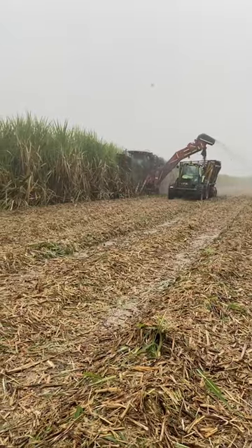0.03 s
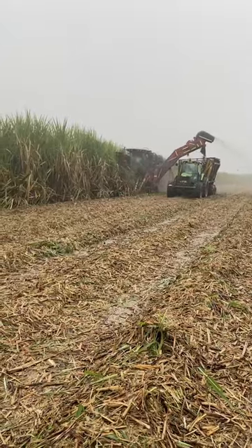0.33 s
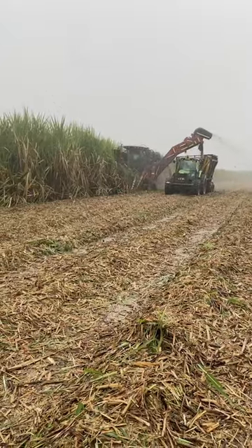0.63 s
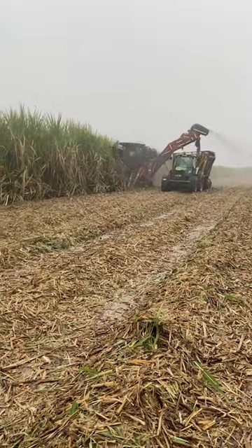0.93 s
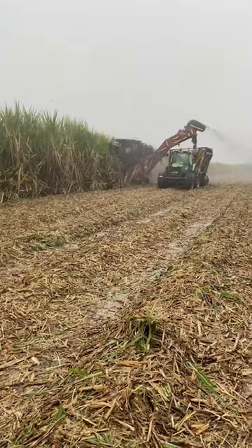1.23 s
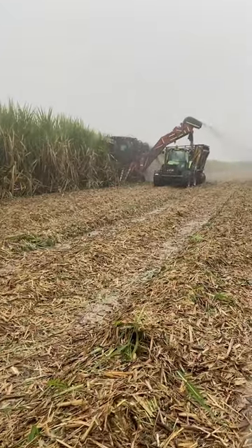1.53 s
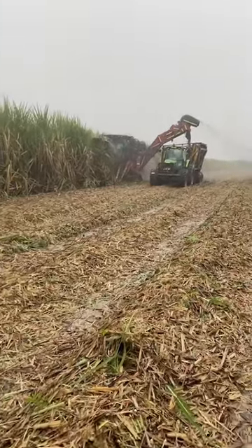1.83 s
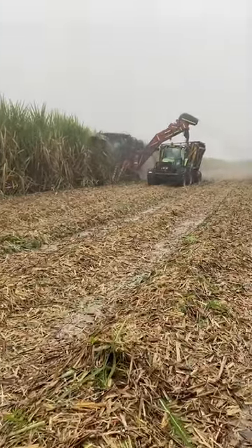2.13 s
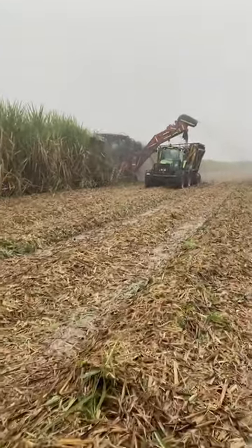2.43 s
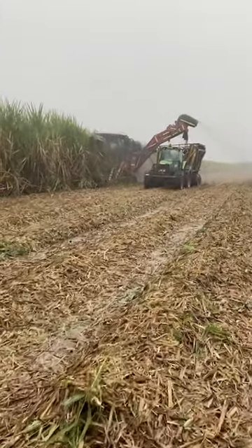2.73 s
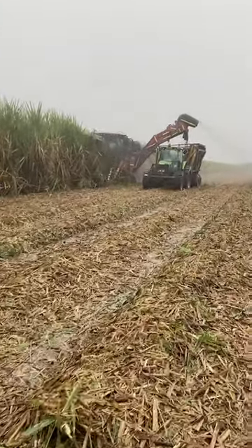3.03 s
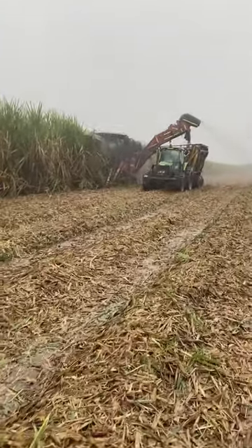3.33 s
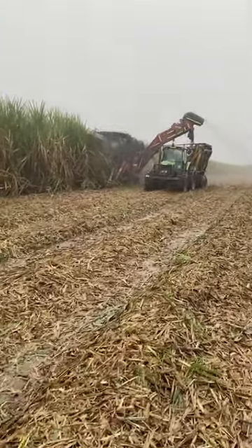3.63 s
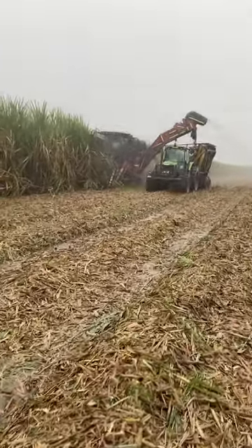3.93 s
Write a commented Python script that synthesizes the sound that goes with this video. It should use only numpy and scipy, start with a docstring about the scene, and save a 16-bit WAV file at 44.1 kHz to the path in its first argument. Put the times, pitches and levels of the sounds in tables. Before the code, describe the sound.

Deep, continuous diesel drone comes from a harvester and a tractor working across an open field, with whirring drums and rustling leaves. Cane twice surges through, snapping and crunching, amid scattered metal clanks and a few close, dull thumps.

```python
"""A sugarcane harvester and a tractor work side by side, some way off in an open field.
From the start a diesel drones and beats against a second engine, over exhaust rumble and gear whine.
Fans roar, chopper drums whirr, leaves hiss and panels clank. After a second come the first stalk snaps
and dull, close bumps. Cane surges in at about 1.4 s and again near 3 s: the roar and crackle swell,
wads crunch, the rustle takes on a hollow colour, and brief tones rise out of the whirr."""
import sys
import numpy as np
from scipy import signal
from scipy.fft import rfft, irfft, next_fast_len
from scipy.io import wavfile
from scipy.ndimage import uniform_filter1d, map_coordinates

SR = 44100
rng = np.random.default_rng(int(sys.argv[2]) if len(sys.argv) > 2 else 0)


def dump(signal):
    """Clip the signal to [-1, 1] and save it as 16-bit WAV at the path in sys.argv[1]."""
    limited = np.clip(np.atleast_2d(signal).T, -1, 1)
    pcm = np.round(limited * 32767).astype(np.int16)
    wavfile.write(sys.argv[1], SR, pcm)


N = 176400

# diesel firing rate: t/s, f/Hz
FIRING_RATE = [(0, 80.55), (1, 80.24), (2.1, 80.04), (2.7, 80.4), (3.5, 80.5), (4, 81.5)]
# cane going through the machine: t/s, load/dB
CANE_LOAD = [(0, 1), (.2, -1), (.45, -2.5), (1.31, -2.5), (1.37, 2), (1.67, 2.5), (1.77, 1.5), (1.87, 2.5),
             (2.02, 2), (2.2, -0.5), (2.38, -2), (2.7, -0.5), (3.0, 4.5), (3.07, 1.5), (3.24, 5),
             (3.38, 0.5), (3.62, 2), (3.7, -1.5), (3.84, 0.5), (4, -2.5)]
# diesel note: t/s, level/dB
DRONE_LEVEL = [(0, -12), (.4, -12), (.75, -11), (1.2, -12), (1.75, -10.5), (2.15, -12.5), (2.5, -11),
               (3.5, -11.5), (4, -11)]
# its overtones: multiple, relative level/dB
DRONE_OVERTONES = [(2, -28.5), (3, -34.5)]
# colours of exhaust, fans and leaves: f/Hz, relative level/dB
EXHAUST_SPECTRUM = [(20, -25), (40, -23), (52, -6.5), (62, -1.5), (75, -8), (100, -7), (118, -5.5),
                    (135, 1), (165, -2.5), (220, -7), (290, -14), (420, -18), (800, -27.5), (3000, -74)]
FAN_SPECTRUM = [(150, -20), (350, -12), (500, -4), (660, 1), (800, -1.5), (950, -3), (1300, -5),
                (1800, -9.5), (2200, -12), (4000, -19), (8000, -24.5), (13000, -34)]
LEAF_SPECTRUM = [(300, -25), (900, -0.5), (1750, 2), (2200, -0.5), (2800, 0.5), (3500, -3.5), (4300, -0.5),
                 (5600, -3), (6400, -3), (7600, -9.5), (8900, -3.5), (10000, -11), (11200, -12.5),
                 (12500, -15.5)]
# colour of the wide low rush: f/Hz, relative level/dB
LOW_RUSH_SPECTRUM = [(20, 1), (80, 0), (200, -10), (500, 4), (900, -14), (2000, -56)]
# gears and pumps: f/Hz, starting level/dB, pitch wander/fraction, growth/(dB/s)
GEAR_WHINES = [(325.5, -45, 0.0026, 0), (366, -53.5, 0.0023, 3), (1307, -43, 0.0039, -.5),
               (1820, -47, 0.00705, 0.5)]
# chopper drum harmonics: multiple, relative level/dB
DRUM_HARMONICS = [(9, -2), (10, -1), (11, -0.5), (12, -1.5), (13, -6.5)]
# narrow bands of hiss: start/s, end/s, f/Hz, width/Hz, level/dB
HISS_BANDS = [(0, .17, 4530, 200, -39), (1.37, 2.0, 1750, 600, -35.5), (1.37, 2.05, 3580, 120, -41.5),
              (1.45, 2.05, 4200, 200, -41), (2.32, 2.47, 4000, 180, -42), (2.799, 3.45, 1720, 189, -38.5),
              (2.8, 3.45, 2600, 80, -43), (2.8, 3.45, 3140, 140, -44), (2.903, 3.1, 4200, 400, -36.5)]
# crushed wads, woody when low and leafy when high: peak t/s, length/s, level/dB, centre f/Hz
WAD_CRUNCHES = [(0.057, 0.17, -41, 9050), (1.44, .09, -30.5, 1700), (1.56, 0.082, -32, 1710),
                (1.71, 0.13, -27.5, 1590), (1.835, 0.045, -36, 9800), (2.12, 0.27, -41, 9200),
                (2.525, 0.053, -34, 1600), (2.95, .12, -34, 1660), (3.275, 0.061, -28.5, 1597),
                (3.85, .06, -35, 1600)]
# panel clanks: t/s, level/dB
PANEL_HITS = [(.06, -30), (.575, -24.5), (1.22, -27), (1.66, -23), (2.075, -26.5), (2.915, -25),
              (3.27, -26), (3.835, -26)]
# sheet-metal modes: f/Hz, relative level/dB, t60/s
PANEL_MODES = [(601, -5, 0.22), (667, 0, 0.2), (756, -2.5, 0.15), (828, -0.5, 0.17)]
# breaking stalks: t/s, level/dB, centre f/Hz
STALK_SNAPS = [(1.062, -27, 3300), (1.657, -23, 2600), (1.878, -22.5, 3400), (1.957, -25, 3600),
               (2.761, -28, 3300), (2.927, -28, 2000), (3.605, -27, 2700)]
# dull bumps: t/s, level/dB, final f/Hz, rise/s
DULL_BUMPS = [(1.065, -18.5, 195, 0.018), (1.4826, -8, 170, 0.003), (1.69, -19.5, 188, 0.021),
              (3.291, -17, 256, .004)]
# bounce off the ground: t/s, strength/fraction
GROUND_BOUNCE = [(1.1, 0), (1.4, 0.37), (1.9, 0.23), (2.2, .08)]
# tones in the whirr: peak t/s, length/s, f/Hz, glide/(Hz/s), level/dB
WHIRR_TONES = [(1.441, .07, 775, -200, -33), (1.59, 0.086, 795, 600, -32), (1.78, .06, 865, 400, -32.5),
               (2.867, .05, 855, 0, -32), (2.945, 0.046, 812, 0, -27.5)]
# microphone pair: f/Hz, left-right correlation
MIC_LIKENESS = [(200, 1), (400, 0.98), (700, 1), (1300, 1), (1700, 1), (2200, 0.59), (3300, 0.68),
                (4200, 0.81), (6000, 1), (7300, 1), (9000, 0.88), (10500, 1), (12500, 0.71)]
# microphone pair: f/Hz, phase lead of left/rad
MIC_LEAD = [(1600, 0), (2100, 0), (2400, 0), (3100, 0.5), (3450, 0.5), (3800, 0.53), (4600, 0.55),
            (5200, -0.06), (5600, 1), (6100, 1.63), (7200, 3), (7700, 3.5), (8300, 4), (9400, 5),
            (9800, 6.5), (11600, 7), (12400, 9)]
# microphone pair: f/Hz, left minus right level/dB
MIC_BALANCE = [(1300, 0), (2100, 3.5), (2500, -1), (2950, -4.5), (3350, 5), (3700, -5), (4300, -2),
               (5100, 0), (6200, 2), (7200, -3), (12000, 1)]


def amp(db):
    """Decibels to gain."""
    return 10 ** (np.asarray(db) / 20)


def unit(x):
    """Scale to rms 1."""
    return x / np.sqrt(np.mean(x ** 2) + 1e-20)


def along(points, hz):
    """Read (f/Hz, value) points on a log frequency axis."""
    f, v = np.transpose(points)
    return np.interp(np.log(hz + 1), np.log(f + 1), v)


def curve(rows):
    """An automation lane from (t/s, value) points."""
    return np.interp(np.arange(N) / SR, *np.transpose(rows))


def wobble(rate):
    """A smooth random modulator, rate knots a second."""
    return map_coordinates(rng.standard_normal(2048), [np.arange(N) * rate / SR], mode="wrap")


def swell(s, length):
    """A bell-shaped envelope peaking at time s."""
    return np.exp(-2 * ((np.arange(N) / SR - s) / length) ** 2)


def turning(hz):
    """Phase of something that turns at this rate."""
    return 2 * np.pi * np.cumsum(hz * np.ones(N)) / SR


def filtered(x, response):
    """Pass x through a complex frequency response."""
    m = next_fast_len(N + SR // 2)
    return irfft(rfft(x, m) * response(np.fft.rfftfreq(m, 1 / SR)), m)[..., :N]


def band(centre_hz, octaves):
    """A bell-shaped spectrum as (f/Hz, level/dB) points."""
    steps = np.linspace(-5, 5, 21)
    return np.transpose([centre_hz * 2 ** (steps * octaves), -10 * np.log10(np.e) * steps ** 2])


def spread(pair, spectrum):
    """Turn two unrelated signals into one coloured stereo sound of rms 1."""
    def mid_side(hz):
        angle = np.arccos(np.clip(along(MIC_LIKENESS, hz), -1, 1)) / 2
        return amp(along(spectrum, hz)) * [np.cos(angle), np.sin(angle)]
    mid, side = filtered(pair, mid_side)
    return unit(np.array([mid + side, mid - side]))


def rush(spectrum, patchy_db, drift_db):
    """Stereo noise with quick patches of random gain and a slowly drifting colour."""
    noise = signal.stft(rng.standard_normal((2, N)), nperseg=1024)[2]

    def patches(frames):
        across_bins = uniform_filter1d(rng.standard_normal(noise.shape[1:]), size=5, axis=0)
        return unit(uniform_filter1d(across_bins, size=frames, axis=1))
    gain = amp(patchy_db * patches(frames=9) + drift_db * patches(frames=70))
    return spread(signal.istft(noise * gain, nperseg=1024)[1][:, :N], spectrum)


def grains(per_s):
    """Two trains of tiny clicks with shared timing and unrelated sizes."""
    hits = (rng.random(N) < per_s / SR) * amp(2.1 * np.minimum(rng.exponential(size=N), 3))
    return hits * rng.standard_normal((2, N))


def low_rush(level_db=-50):
    """A faint low bed, unrelated left and right for width."""
    noise = rng.standard_normal((2, N))
    return amp(level_db) * unit(filtered(noise, lambda hz: amp(along(LOW_RUSH_SPECTRUM, hz))))


def engines(firing, throb_hz=11.4, second_hz=64.5, second_db=-34):
    """The diesel's firing note throbs lightly and beats against a lower second engine."""
    overtones = sum(amp(db + 2.4 * wobble(6.5)) * np.sin(k * firing + rng.uniform(0, 2 * np.pi))
                    for k, db in DRONE_OVERTONES)
    throb_db = 0.1 * np.sin(turning(throb_hz * (1 + 0.094 * wobble(2.7)))) + 0.19 * wobble(9)
    diesel = amp(curve(DRONE_LEVEL) + throb_db) * (np.sin(firing) + overtones)
    second_gain = amp(second_db + 1.1 * wobble(2.5))
    second = second_gain * np.sin(turning(second_hz * (1 + 0.011 * wobble(3.75))))
    return np.sqrt(2) * (diesel + second)


def exhaust(load, level_db=-24):
    """Exhaust rumble that lifts a little under load."""
    gain = amp(level_db + 0.2 * load + 0.57 * wobble(12))
    return gain * rush(EXHAUST_SPECTRUM, patchy_db=0.1, drift_db=0.5)


def gears():
    """Thin, unsteady whines of gears and pumps."""
    out, t = 0, np.arange(N) / SR
    for hz, db, wander, growth in GEAR_WHINES:
        gain = amp(db + growth * t + 2.0 * wobble(9))
        out += gain * np.sin(turning(hz * (1 + wander * wobble(25))))
    return np.sqrt(2) * out


def fans(firing, level_db=-27):
    """Midrange fan roar, lightly pulsed by the engine."""
    gain = amp(level_db + 0.84 * wobble(18) + 0.45 * np.sin(firing))
    return gain * rush(FAN_SPECTRUM, patchy_db=0.73, drift_db=0.68)


def choppers(base_hz=66.46, turn_hz=3.2, level_db=-42.5):
    """The chopper drums whirr, their pitch swaying with each turn."""
    sway = 0.0308 * np.sin(turning(turn_hz))
    drum = turning(base_hz * (1 + sway + 0.01013 * wobble(20)))
    whirr = sum(amp(level_db + db + 4.2 * wobble(16)) * np.sin(k * drum + rng.uniform(0, 2 * np.pi))
                for k, db in DRUM_HARMONICS)
    return np.sqrt(2) * whirr


def leaves(load, hiss_db=-30.5, crackle_db=-36):
    """Leaves hiss and crackle through the extractor, riding the load."""
    hiss = amp(hiss_db) * rush(LEAF_SPECTRUM, patchy_db=1.8, drift_db=1.7)
    crackle = amp(crackle_db) * spread(grains(per_s=1500), LEAF_SPECTRUM)
    return amp(0.89 * load + 0.9 * wobble(28.18)) * (hiss + crackle)


def hiss_bands(fade_s=0.14):
    """Narrow bands of hiss fade in and out, giving the rustle a shifting, hollow colour."""
    out, t = 0, np.arange(N) / SR
    for start, end, hz, width, db in HISS_BANDS:
        peak = [(hz - 2 * width, -50), (hz - width / 2, -3), (hz, 0),
                (hz + width / 2, -3), (hz + 2 * width, -50)]
        gate = np.clip(np.minimum(t - start, end - t) / fade_s + 0.5, 0, 1)
        out += gate * amp(db + 1.7 * wobble(30)) * spread(rng.standard_normal((2, N)), peak)
    return out


def crunches():
    """Each crushed wad of cane swells and fades as a cloud of tiny cracks."""
    return sum(amp(db) * swell(s, length) * spread(grains(per_s=1400), band(hz, octaves=0.4))
               for s, length, db, hz in WAD_CRUNCHES)


def add(track, s, sound):
    """Drop a one-shot onto the track at time s."""
    part = track[round(s * SR):][:len(sound)]
    part += sound[:len(part)]


def clanks(attack_s=0.007):
    """Sheet-metal panels ring in short modes, tuned a little differently on each hit."""
    out, t = np.zeros(N), np.arange(SR // 3) / SR
    for s, db in PANEL_HITS:
        ring = 0
        for hz, mode_db, t60 in PANEL_MODES:
            decay = amp(mode_db + rng.normal(0, 1.6) - 60 * t / t60)
            ring += decay * np.sin(2 * np.pi * (hz * rng.normal(1, 0.014) * t + rng.random()))
        add(out, s, amp(db) * ring * (1 - np.exp(-t / attack_s)))
    return out


def snaps(attack_s=0.00069, t60=0.13):
    """Single stalks crack and splinter in a sharp burst of clicks."""
    out, t = 0, np.arange(N) / SR
    for s, db, hz in STALK_SNAPS:
        age = np.maximum(t - s, 0)
        envelope = amp(db - 60 * age / t60) * (1 - np.exp(-age / attack_s))
        out += envelope * spread(grains(per_s=9000), band(hz, octaves=0.78))
    return out


def bumps(start_hz=579, fall_s=0.0055, body_hz=170, body_db=-7.5, body_rise_s=0.0044):
    """Dull bumps: a thud that dives in pitch over a short, low body tone."""
    out, t = np.zeros(N), np.arange(SR // 3) / SR
    for s, db, end_hz, rise in DULL_BUMPS:
        hz = end_hz + (start_hz - end_hz) * np.exp(-t / fall_s)
        thud = (t / rise * np.exp(1 - t / rise)) ** 2 * np.sin(2 * np.pi * np.cumsum(hz) / SR)
        body = t / body_rise_s * np.exp(1 - t / body_rise_s) * np.sin(2 * np.pi * body_hz * t)
        add(out, s, amp(db) * (thud + amp(body_db) * body))
    return out


def over_ground(x, delay_s=0.001538, dull_hz=5170):
    """An inverted ground bounce hollows out the sound; litter scatters the bounce's top end."""
    bounce = filtered(x, lambda hz: np.exp(-2j * np.pi * hz * delay_s) / (1 + (hz / dull_hz) ** 10))
    return x - curve(GROUND_BOUNCE) * bounce


def whirr_tones():
    """Brief tones, most of them gliding, rise out of the whirr."""
    out, t = 0, np.arange(N) / SR
    for s, length, hz, glide, db in WHIRR_TONES:
        pitch = (hz + glide * (t - s)) * (1 + 0.00796 * wobble(50))
        out += amp(db) * swell(s, length) * np.sin(turning(pitch))
    return np.sqrt(2) * out


def scene():
    """The mix: a machine bed shaped by firing rate and cane load, with timed hits on top."""
    firing, load = turning(curve(FIRING_RATE)), curve(CANE_LOAD)
    bed = low_rush() + engines(firing) + exhaust(load) + gears()
    machinery = amp(0.32 * load) * (fans(firing) + choppers()) + whirr_tones()
    cane = over_ground(leaves(load) + snaps() + crunches()) + hiss_bands()
    return bed + machinery + cane + clanks() + bumps()


def record(dry, top_hz=12400):
    """A band-limited microphone pair whose sides differ in treble level and phase."""
    half = np.array([[0.5], [-0.5]])

    def response(hz):
        balance = amp(half * along(MIC_BALANCE, hz))
        lead = np.exp(1j * half * along(MIC_LEAD, hz))
        return balance * lead * (hz < top_hz)
    return filtered(dry, response)


dry = scene()
out = record(dry)
dump(out)
```